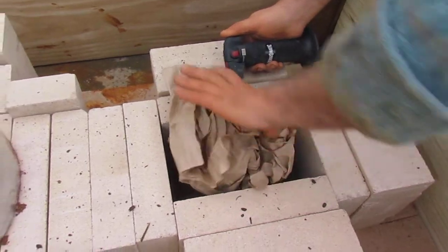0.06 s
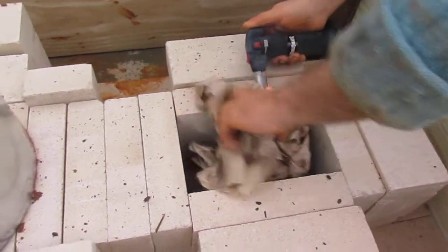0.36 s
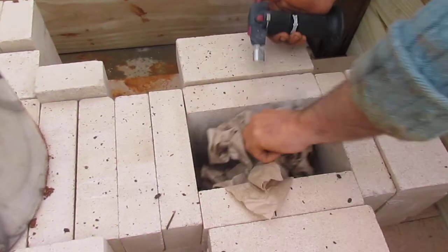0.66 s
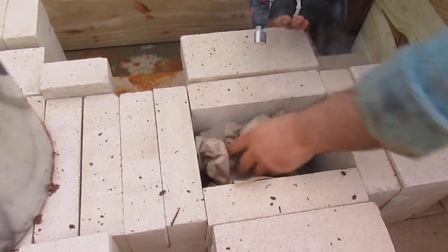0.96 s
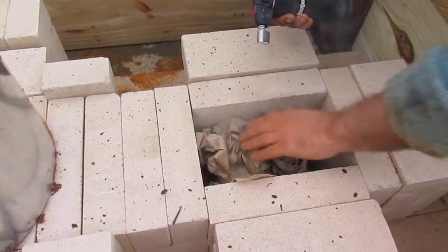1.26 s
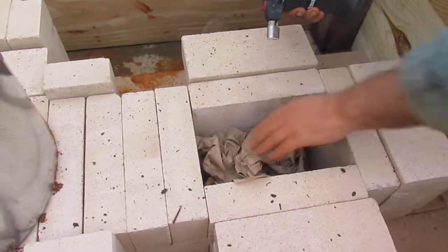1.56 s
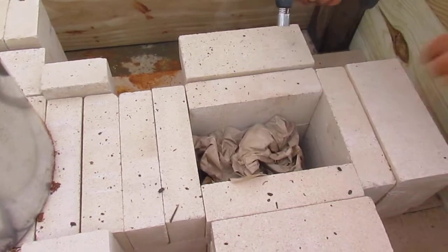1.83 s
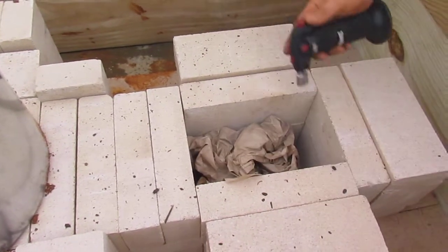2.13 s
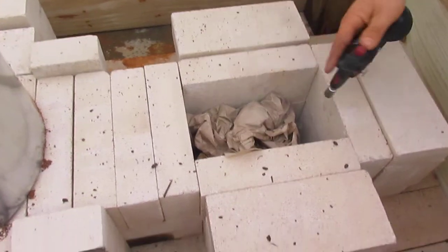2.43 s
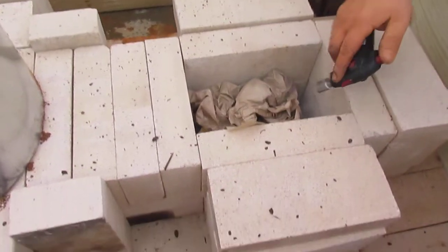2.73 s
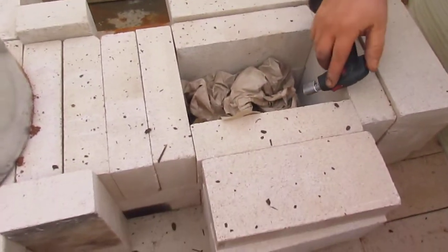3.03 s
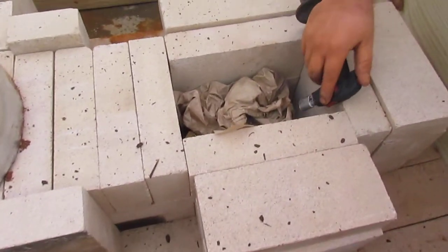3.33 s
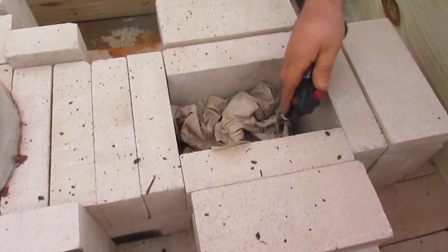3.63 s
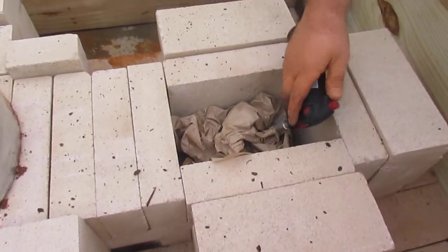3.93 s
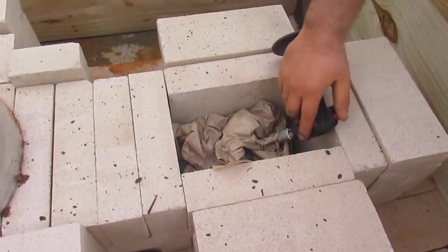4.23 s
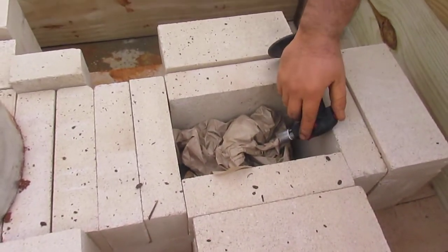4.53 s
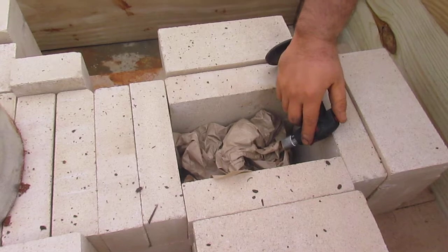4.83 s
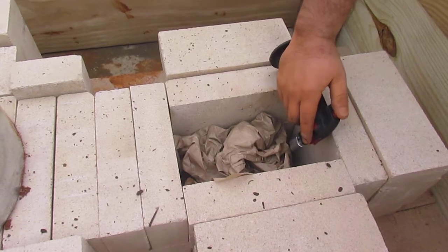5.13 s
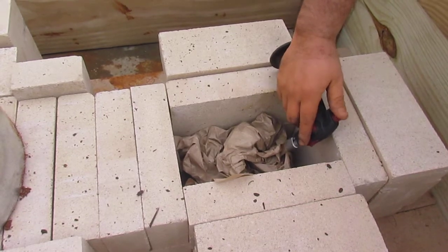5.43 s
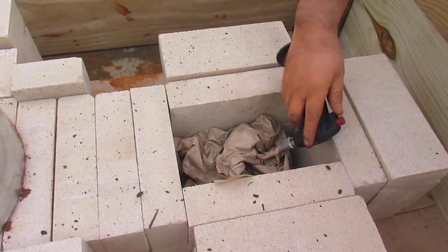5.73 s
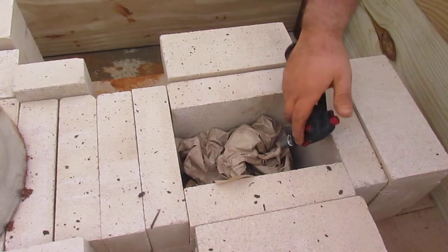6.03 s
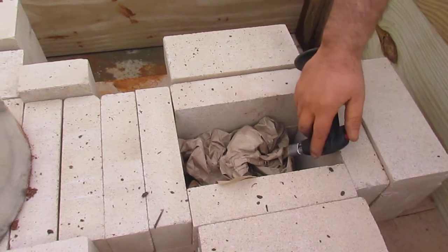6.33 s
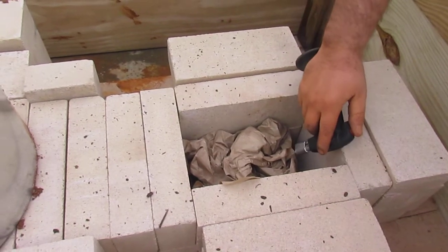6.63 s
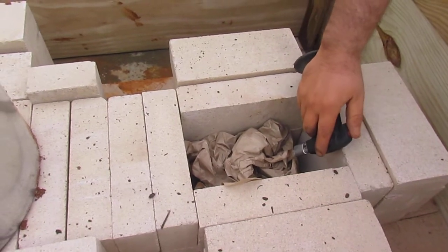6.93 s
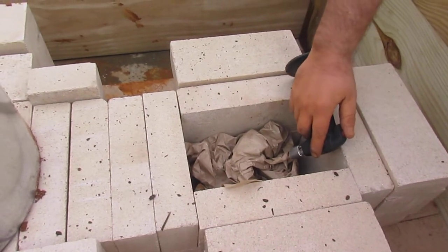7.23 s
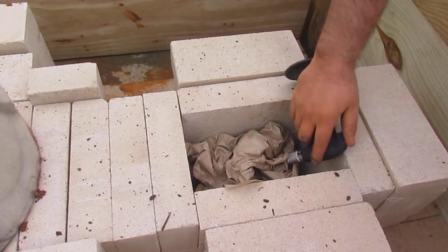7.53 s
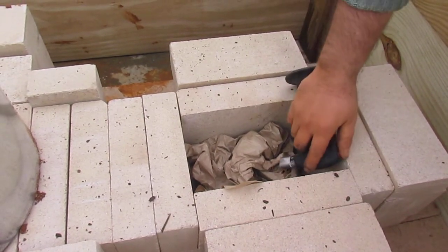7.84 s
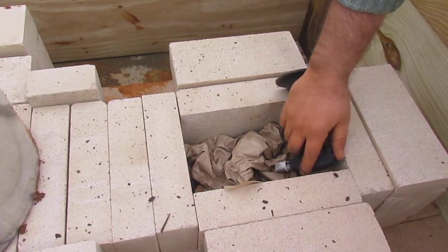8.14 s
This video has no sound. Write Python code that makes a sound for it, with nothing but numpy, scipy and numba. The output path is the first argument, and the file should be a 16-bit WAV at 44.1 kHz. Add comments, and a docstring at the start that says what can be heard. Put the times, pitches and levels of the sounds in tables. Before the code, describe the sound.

A fan rushes with a faint low hum throughout. At first a hand stuffs crumpled paper into a small brick stove, rustling and crackling for about a second and a half. Then a handheld gas torch's igniter snaps six times, roughly a second apart, with a few softer clicks as the trigger springs back. Each snap is close and loud, briefly pushing down the fan noise.

```python
"""A fan rushes and hums while a hand stuffs crumpled paper into a small firebrick stove.
The paper rustles by friction and cracks where its folds buckle. Six tries to light a gas torch follow:
the piezo igniter's hammer sets the housing and metal parts ringing, and three times the trigger is heard
springing back. Each snap overloads the microphone, whose gain control ducks the rush and lets it
swell back."""
import sys
import numpy as np
from scipy import signal
from scipy.fft import rfft, irfft
from scipy.io import wavfile
from scipy.ndimage import uniform_filter1d
from numba import njit

SR = 44100
rng = np.random.default_rng(int(sys.argv[2]) if len(sys.argv) > 2 else 0)


def to_wav(s):
    """Save 16-bit WAV."""
    ch = np.atleast_2d(s).T  # columns
    pcm = np.round(np.clip(ch, -1, 1) * 32767)  # PCM
    wavfile.write(sys.argv[1], SR, pcm.astype(np.int16))


N = 364998
TIME = np.arange(N) / SR

# the fan as the listener moves: (time [s], rush level [dB], throb gain [dB])
FAN_LEVELS = [(0, -22.7, 2), (1.3, -25.5, 1.5), (2.4, -25, 3), (3.4, -25.5, 4), (5.2, -25, 1), (7, -26, -9),
              (8.28, -25, -5)]
# spectrum of crushed paper: (frequency [Hz], gain [dB])
PAPER_SPECTRUM = [(100, -17), (230, -9), (320, 5.5), (410, -9), (510, -5.5), (1100, 1.5), (2300, 1.5),
                  (4200, -0.5), (6500, 0.5), (8500, 2.5), (11000, 3), (13000, -5.5), (15000, -13),
                  (16000, -39)]


def amp(db):
    """Decibels as an amplitude ratio."""
    return 10 ** (np.asarray(db) / 20)


def unit(x):
    """Power normalisation to rms 1."""
    return x / np.sqrt(np.mean(x ** 2) + 1e-20)


def hit(x):
    """Energy normalisation: each channel equals 10 ms at rms 1."""
    return x / np.sqrt(np.sum(x ** 2, 1, keepdims=True) / (SR / 100))


def curves(rows):
    """Linear interpolation of each column over time."""
    times, *columns = np.transpose(rows)
    return [np.interp(TIME, times, column) for column in columns]


def add(mix, start_s, sound):
    """Superposition of a stereo sound on the mix."""
    part = mix[:, max(round(start_s * SR), 0):][:, :sound.shape[1]]
    part += sound[:, :part.shape[1]]


def colour(x, spectrum, size=2048):
    """Minimum-phase filtering by a spectrum drawn on a log-frequency axis."""
    hz, db = np.transpose(spectrum)
    bins_hz = abs(np.fft.fftfreq(size, 1 / SR))
    log_gain = np.log(amp(np.interp(np.log(bins_hz + 1), np.log(hz + 1), db)))
    taps = np.fft.ifft(np.exp(np.conj(signal.hilbert(log_gain)))).real
    return signal.oaconvolve(x, taps[None, :size // 2], axes=1)[:, :x.shape[1]]


def spread(x, side_spectrum):
    """Mid-side stereo: an uncorrelated side signal gives width."""
    side = colour(x[1:], side_spectrum)[0]
    return np.array([x[0] + side, x[0] - side])


def drift(rate_hz):
    """Random modulation: low-passed noise of rms 1."""
    hz = np.fft.rfftfreq(N // 32, 32 / SR)
    slow = irfft(rfft(rng.standard_normal(N // 32)) / (1 + (hz / rate_hz) ** 4))
    return unit(np.interp(np.arange(N) / 32, np.arange(len(slow)), slow))


def fan_rush(waver_db=0.3):
    """Turbulent air radiates broadband noise."""
    # spectrum of the airflow: (frequency [Hz], gain [dB])
    spectrum = [(60, -7), (100, -5), (190, -5), (340, -2.5), (480, -2), (720, 0.84), (1100, -0.8),
                (1480, 0.6), (1800, -2), (2100, -2.7), (2300, 0.3), (2600, -1.5), (3300, -3.5),
                (3700, -5.5), (4500, -8), (5700, -12.5), (10000, -16), (11500, -19), (13200, -28.5),
                (15500, -43)]
    # stereo width: (frequency [Hz], side minus mid [dB])
    width = [(60, -15), (110, -66), (200, -20), (380, -13), (700, -12), (1290, -7.5), (2380, -3.5),
             (4400, -3), (8120, 1.5), (15000, 1)]
    rush_db, _ = curves(FAN_LEVELS)
    air = colour(spread(rng.standard_normal((2, N)), width), spectrum)
    air = unit(signal.sosfilt(signal.butter(2, 60, "high", fs=SR, output="sos"), air))
    return air * amp(rush_db + waver_db * drift(3.1))


def fan_motor(shaft_hz=29.06, hum_hz=120.05, hum_db=-34.5, whirr_hz=(87.2, 174.3, 261.4)):
    """Periodic forcing: an unbalanced shaft throbs at its harmonics, and the mains drives a hum."""
    # low shaft harmonics: (order, level [dB])
    throb_orders = [(1, -45), (2, -48), (4, -52.5), (5, -50)]
    # three tones swell and fade: (time [s], low level [dB], middle level [dB], high level [dB])
    whirr_levels = [(0, -36, -38.5, -42.5), (0.6, -41, -40, -41), (0.9, -43.5, -42.5, -40),
                    (1.3, -55, -40, -53), (1.9, -50.5, -38.5, -51.5), (2.65, -46, -38.5, -39),
                    (3.15, -47.5, -50, -56), (3.8, -44, -38.5, -43.5), (4.45, -40, -40, -45.5),
                    (5.05, -48, -44.5, -40), (5.45, -51, -45, -43.5), (5.9, -52, -43, -49.5),
                    (6.2, -51, -38, -45), (6.6, -45, -37, -48.5), (7.05, -47, -50, -46.5),
                    (7.7, -46, -47.5, -45.5), (8.28, -51, -42, -38.5)]
    # high shaft harmonics: (order, level [dB])
    whine_orders = [(7, -57), (8, -56.5), (10, -56), (15, -54.5), (18, -51)]
    # the hum's third harmonic and its sidebands: (offset [shaft rates], level [dB])
    sidebands = [(-1, -47.5), (0, -51), (1, -46)]

    def tone(hz, db, waver_db):
        peak = np.sqrt(2) * amp(db + waver_db * drift(0.95))
        return peak * np.sin(2 * np.pi * (hz * TIME + rng.random()))
    _, throb_db = curves(FAN_LEVELS)
    throb = sum(tone(order * shaft_hz, db + throb_db, 2) for order, db in throb_orders)
    whirr = sum(tone(hz, db, 0.5) for hz, db in zip(whirr_hz, curves(whirr_levels)))
    whine = sum(tone(order * shaft_hz, db, 2.5) for order, db in whine_orders)
    whine += sum(tone(3 * hum_hz + step * shaft_hz, db, 2.5) for step, db in sidebands)
    return throb + whirr + whine + tone(hum_hz, hum_db, 0.5)


def crushing(attack_s=0.035, release_s=0.036, settle_s=0.086, settle_db=-3, settle_db_per_octave=-1.5):
    """Incoherent sources add in power: pushes and the wad's settling set the rustle's gain and tilt."""
    # the hand presses the paper: (start [s], length [s], level [dB], tilt [dB/octave])
    pushes = [(-0.01, 0.043, -28.5, 4.5), (0.078, .05, -31, 1), (0.152, 0.11, -21.5, 1),
              (0.276, 0.075, -17.5, 0), (0.335, 0.11, -15, 0.5), (0.46, 0.041, -19.5, -3),
              (0.524, 0.13, -20.5, -1.5), (0.653, 0.1, -19.5, -0.8), (0.733, 0.1, -17.5, 0),
              (0.83, 0.04, -15.5, 0.5), (0.94, 0.06, -22.5, 0), (1.02, 0.047, -30.5, -3.5),
              (1.2, 0.093, -32, -2), (1.269, 0.076, -22, 2.5), (1.424, 0.065, -30.5, -4)]
    power, tilt = np.full(N, 1e-12), np.zeros(N)
    for start, length, db, push_tilt in pushes:
        rise = np.clip((TIME - start) / attack_s, 0, 1)
        after_s = np.maximum(TIME - start - length, 0)
        pressed = (amp(db) * rise * np.exp(-after_s / release_s)) ** 2
        settling = (amp(db + settle_db) * rise * np.exp(-after_s / settle_s)) ** 2
        power += pressed + settling
        tilt += pressed * push_tilt + settling * settle_db_per_octave
    return np.sqrt(power), tilt / power


def paper_rustle(grains_per_s=6000, slide_gain=1.9, pivot_hz=4000, folds_db=1.5, clump_hz=74):
    """Shot noise of snapping fibres comes in clumps over the friction hiss of paper on brick."""
    # stereo width: (frequency [Hz], side minus mid [dB])
    width = [(60, -20), (110, -20), (200, -20), (380, -21), (700, -9), (1290, -11), (2380, -5.5),
             (4400, -6), (8120, -4), (15000, -0.5)]
    gain, tilt = crushing()
    grains = (rng.random(N) < grains_per_s / SR) * amp(np.minimum(rng.exponential(1, N), np.pi))
    fibres = unit(grains * rng.standard_normal((2, N)))
    hiss = slide_gain * rng.standard_normal((2, N))
    rustle = unit(colour(spread(fibres + hiss, width), PAPER_SPECTRUM))
    hz, times, bands = signal.stft(rustle, SR, nperseg=256)
    octaves = np.log2(np.maximum(hz, 500) / pivot_hz)[:, None]
    # each moving fold favours its own band for a moment
    folds = uniform_filter1d(rng.standard_normal(bands.shape[1:]), size=7, axis=0)
    folds = unit(uniform_filter1d(folds, size=6, axis=1))
    bands = bands * amp(octaves * np.interp(times, TIME, tilt) + folds_db * folds)
    rustle = signal.istft(bands, SR, nperseg=256)[1][:, :N]
    return rustle * gain * amp(drift(clump_hz))


def burst(decay_s, wall_db=-17, wall_s=0.0069, room_db=-40, room_s=0.12):
    """Reverberation: a contact's noise dies fast, scattered by the bricks and for longer by the room."""
    t = TIME[:SR // 4]
    level = np.exp(-t / decay_s) + amp(wall_db) * np.exp(-t / wall_s) + amp(room_db) * np.exp(-t / room_s)
    return level * rng.standard_normal((2, len(t)))


def resonate(x, hz, width_hz):
    """A second-order resonance passes one band."""
    return signal.lfilter(*signal.iirpeak(hz, hz / width_hz, fs=SR), x)


def paper_creases(decay_cycles=4.5, width_hz=820):
    """Buckling: a fold gives way with a crack that excites one resonance."""
    # cracking folds: (time [s], level [dB], pitch [Hz])
    creases = [(.043, -27, 2300), (.201, -22, 9000), (.304, -23, 5000), (.334, -17.5, 10000),
               (.36, -14.5, 4900), (.368, -19, 6200), (.386, -17.5, 4800), (.402, -15, 8200),
               (.416, -15, 4200), (.422, -21, 5000), (.441, -16, 9000), (.5697, -21, 6500),
               (.683, -22, 9500), (.879, -19, 2600), (1.325, -21, 11000), (1.387, -24.5, 10000),
               (1.405, -29, 11000), (1.507, -30, 9000)]
    out = np.zeros((2, N))
    for start, db, hz in creases:
        crack = colour(burst(decay_cycles / hz, wall_db=-14), PAPER_SPECTRUM)
        ring = resonate(crack, hz, width_hz)
        add(out, start, amp(db) * hit(hit(crack) + hit(ring)))
    return out


def paper_rubs(pitch_waver=0.015):
    """Friction drives resonances: the hollow of the stove, a squeak on brick, the crunch of the wad."""
    # rubbed resonances: (middle [s], length [s], frequency [Hz], bandwidth [Hz], level [dB])
    rubs = [(0.49, 0.44, 318, 60, -29), (0.81, 0.22, 312, 70, -29), (1.33, .11, 320, 60, -36.5),
            (.765, .05, 1010, 120, -25), (.794, 0.1, 1120, 22, -18.5), (0.765, .11, 1550, 300, -28),
            (.38, .14, 4700, 1600, -24), (.868, .07, 4800, 3000, -24)]
    out = np.zeros(N)
    for middle, length, hz, width_hz, db in rubs:
        pole = np.exp(-np.pi * width_hz / SR)
        friction = rng.standard_normal(N) + 1j * rng.standard_normal(N)
        band = signal.lfilter([1 - pole], [1, -pole], friction)
        band /= np.sqrt(abs(band))  # friction feeds the resonance fairly evenly
        phase = 2 * np.pi * np.cumsum(hz * (1 + pitch_waver * drift(20))) / SR
        swell = np.cos(np.pi * np.clip((TIME - middle) / length, -0.5, 0.5))
        out += amp(db) * swell * unit((band * np.exp(1j * phase)).real)
    return out


def mode(hz, decay_s, right_lag_turns=0.23):
    """A damped oscillation, lagging in phase on the right."""
    t = TIME[:SR // 4]
    turns = hz * t + rng.random() - np.array([[0], [right_lag_turns]])
    return np.exp(-t / decay_s) * np.sin(2 * np.pi * turns)


def clack(hz, decay_s, width_hz=1900):
    """Heavy damping gives the plastic housing one broad resonance."""
    return hit(resonate(resonate(burst(decay_s), hz, width_hz), hz, width_hz))


def cluster(hz, decay_s, count=3, detune=0.02):
    """Close modes beat into a diffuse ring."""
    pitches = hz * (1 + detune * rng.uniform(-1.04, 1, count))
    return sum(mode(pitch, decay_s) for pitch in pitches) / np.sqrt(count)


def igniter(rattle_s=0.00073, pair_ratio=1.076, pair_db=-1.5, falloff_db_per_octave=16):
    """Impact excitation: a sprung hammer hits the crystal and rebounds, ringing housing and metal."""
    # hammer strikes; the grip sets the pitch of knock and clack: (time [s], level [dB],
    # ring [Hz], ring gain [dB], rebound delay [s], rebound gain [dB], knock [Hz], knock gain [dB],
    # clack [Hz], clack gain [dB], metal gain [dB])
    snaps = [(1.5411, 1.5, 9750, 1, 0.0012, 4.5, 2300, -20, 4300, -14, 5),
             (2.9235, 2.5, 11200, 1, 0.0016, 1, 3630, -20, 5400, -6.5, -8),
             (3.5408, 0.5, 10640, 0, 0.0014, -2, 3400, -11, 5230, -27, -3),
             (4.3770, 2, 10830, 2.5, 0.0025, -5.5, 2750, -12, 5200, -4.5, -5),
             (5.4867, -2, 10360, 0, 0.0012, -21, 3270, -17, 7340, -9, 2),
             (6.4330, 1, 10800, 1.5, 0.0031, -9, 2710, -15, 5470, -6, 0)]
    # spectrum of the impact's rattle: (frequency [Hz], gain [dB])
    spectrum = [(100, -37), (700, -39), (2000, -19), (3500, -4.5), (6000, -4.5), (8500, 0.5), (11000, -3),
                (13000, -0.5), (15000, -24), (16500, -33)]
    # modes of the torch's metal parts: (frequency [Hz], gain [dB], decay [s])
    metal_modes = [(2720, -1, .004), (3540, 0, .005), (4400, -8, 0.028), (9700, -32, 0.028),
                   (10750, -29, .018), (11150, -17, 0.026), (12100, -28, .018), (13600, -26, .02)]
    out = np.zeros((2, N))
    for (start, db, ring_hz, ring_db, delay_s, rebound_db,
         knock_hz, knock_db, clack_hz, clack_db, metal_db) in snaps:
        def blow(ring_s):
            contact = burst(rattle_s, wall_db=-9.5, wall_s=0.0057, room_db=-32, room_s=0.082)
            rattle = hit(colour(contact, spectrum))
            ring = hit(mode(ring_hz, ring_s) + amp(pair_db) * mode(pair_ratio * ring_hz, ring_s))
            return rattle + amp(ring_db) * ring + amp(clack_db) * clack(clack_hz, decay_s=0.0043)
        snap = blow(ring_s=0.0005) + amp(knock_db) * hit(mode(knock_hz, decay_s=0.003))
        add(snap, delay_s, amp(rebound_db) * blow(ring_s=0.002))
        for hz, mode_db, decay_s in metal_modes:
            # modes far from the hammer's ring are excited less
            falloff_db = falloff_db_per_octave * abs(np.log2(hz / ring_hz))
            snap += amp(metal_db + mode_db - falloff_db) * cluster(hz, decay_s)
        add(out, start, amp(db) * hit(snap))
    return out


def trigger(latch_hz=12700, latch_db=-10):
    """Elastic recoil: the trigger clacks home and its spring rings; sliding friction adds scrapes."""
    # returns: (time [s], level [dB], ring [Hz], ring gain [dB], clack [Hz], clack gain [dB])
    returns = [(2.2862, -11, 8150, -11, 5100, -11), (3.7200, -10, 7800, -3, 5500, -11),
               (5.7445, -12.5, 7970, -5, 5800, -19)]
    # the trigger slides and the nozzle brushes the paper: (time [s], level [dB], decay [s])
    scrapes = [(2.917, -28, .006), (3.385, -39, .004), (3.4746, -28, .004), (5.173, -32, .005),
               (5.4455, -24.5, .005), (5.461, -27, .012), (5.469, -21, 0.022), (8.0218, -28, 0.0057),
               (8.0756, -33, .004), (8.088, -29, .04)]
    # spectrum of these contacts: (frequency [Hz], gain [dB])
    spectrum = [(100, -36), (1500, -18), (3500, -15), (5000, -5), (5900, -4), (7500, -0.5), (9000, 1),
                (9900, -3.5), (12800, -2.5), (14000, -13), (15300, -11), (16000, -28)]
    out = np.zeros((2, N))
    for start, db, ring_hz, ring_db, clack_hz, clack_db in returns:
        rattle = hit(colour(burst(decay_s=0.0031, wall_db=-13, wall_s=0.013), spectrum))
        spring = amp(ring_db) * hit(mode(ring_hz, decay_s=0.0029))
        latch = amp(latch_db) * hit(mode(latch_hz, decay_s=0.00083))
        housing = amp(clack_db) * clack(clack_hz, decay_s=0.0051)
        add(out, start, amp(db) * hit(rattle + spring + latch + housing))
    for start, db, decay_s in scrapes:
        add(out, start, amp(db) * hit(colour(burst(decay_s), spectrum)))
    return out


def scene(balance_db=0.42):
    """Fan, paper and torch superpose; a level difference places them a little to the left."""
    fan = fan_rush() + fan_motor()
    paper = paper_rustle() + paper_creases() + paper_rubs()
    return (fan + paper + igniter() + trigger()) * amp([[balance_db], [-balance_db]])


@njit
def gain_reduction(over_db, hold_samples, fast_step, charge, slow_step):
    """Peak hold with two releases: a quick one, then a slow one from a level built by earlier peaks."""
    out = np.zeros(len(over_db))
    fast, slow, wait = 0., 0., 0.
    for i in range(len(over_db)):
        wait -= 1
        if over_db[i] > fast:
            fast, wait = over_db[i], hold_samples
        elif wait < 0:
            fast = max(fast - fast_step, 0.)
        slow = slow + charge * (fast - slow) if fast > slow else max(slow - slow_step, 0.)
        out[i] = max(fast, slow)
    return out


def record(dry, threshold_db=-16, sense_s=0.0087, attack_s=0.00022, hold_s=0.066,
           fast_db_per_s=18, charge_s=1.25, slow_db_per_s=3.5, edge_hz=16000):
    """Automatic gain control lags, so each snap's first cycles clip; a band limit follows."""
    # treble roll-off: (frequency [Hz], gain [dB])
    treble_loss = [(100, 0), (13500, 0), (15000, -2), (16000, -7)]

    def lag(x, seconds):
        pole = np.exp(-1 / (seconds * SR))
        return signal.lfilter([1 - pole], [1, -pole], x)
    power = lag((dry ** 2).mean(0), sense_s)
    over_db = 10 * np.log10(power + 1e-12) - threshold_db
    duck_db = gain_reduction(over_db, hold_s * SR, fast_db_per_s / SR,
                             1 / (charge_s * SR), slow_db_per_s / SR)
    clipped = np.clip(dry * amp(-lag(duck_db, attack_s)), -1, 1)
    dulled = colour(clipped, treble_loss)
    low_pass = signal.firwin(255, edge_hz, window=("kaiser", 9), fs=SR)
    return np.clip(signal.oaconvolve(dulled, low_pass[None], "same", axes=1), -1, 1)


dry = scene()
out = record(dry)
to_wav(out)
```